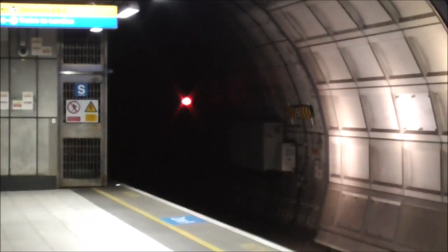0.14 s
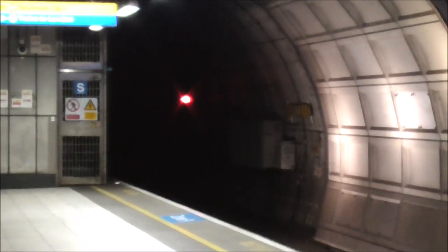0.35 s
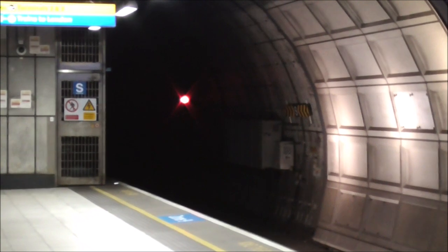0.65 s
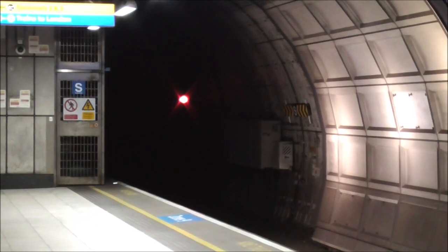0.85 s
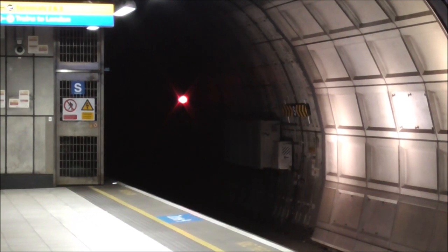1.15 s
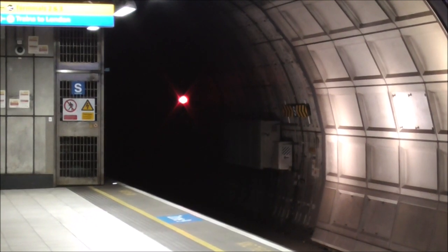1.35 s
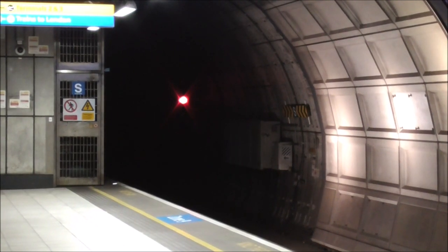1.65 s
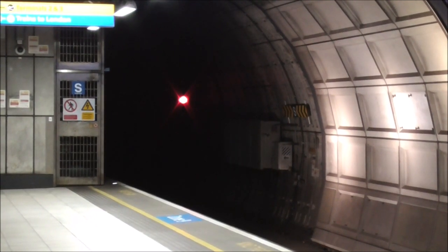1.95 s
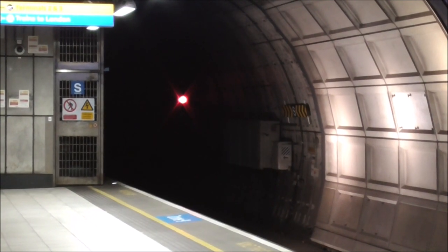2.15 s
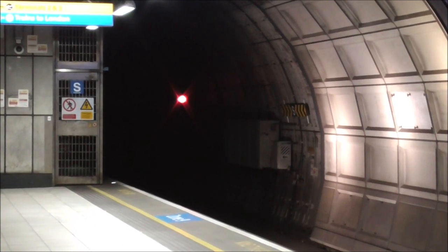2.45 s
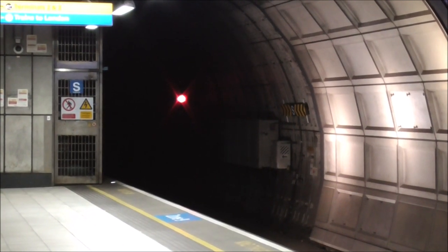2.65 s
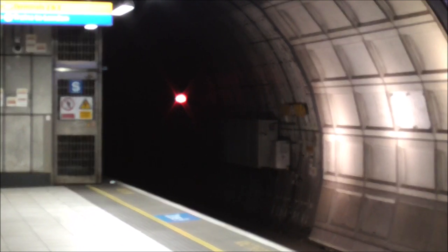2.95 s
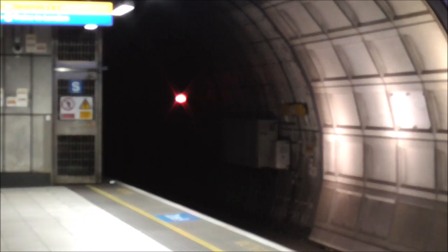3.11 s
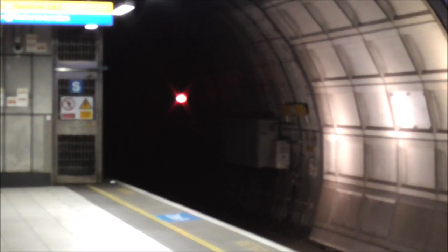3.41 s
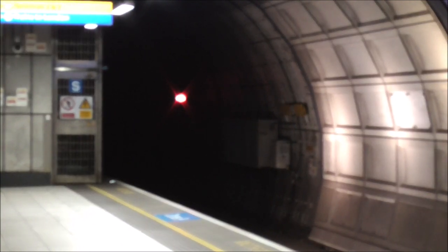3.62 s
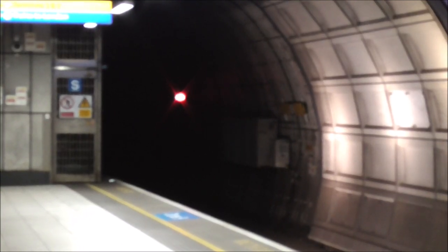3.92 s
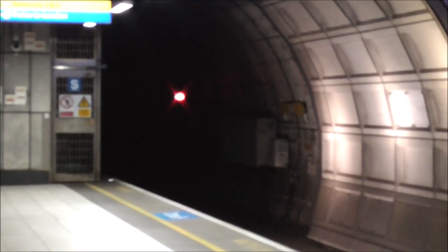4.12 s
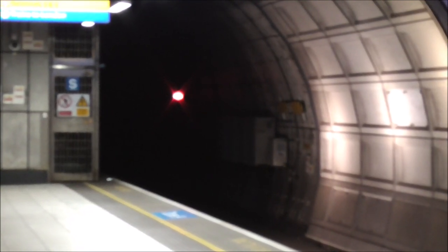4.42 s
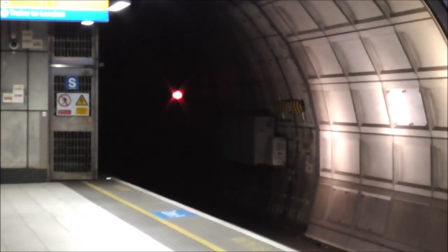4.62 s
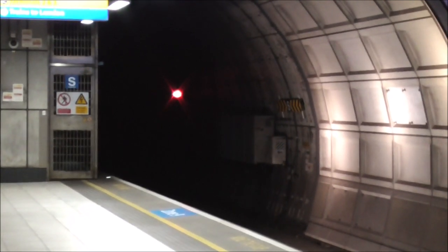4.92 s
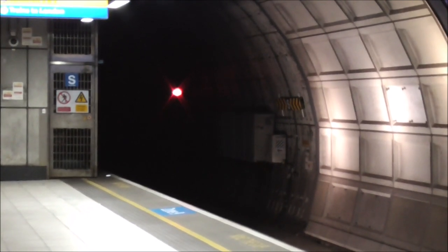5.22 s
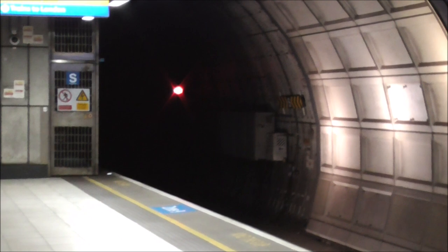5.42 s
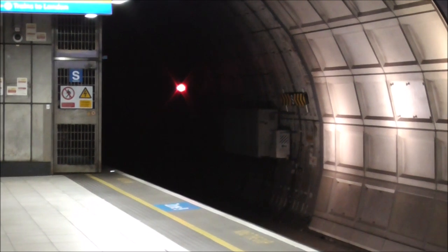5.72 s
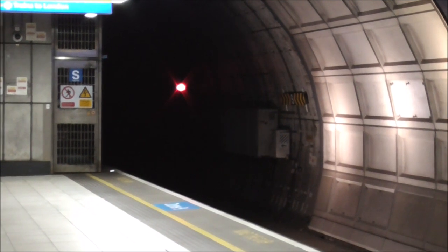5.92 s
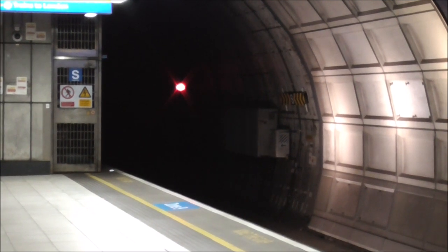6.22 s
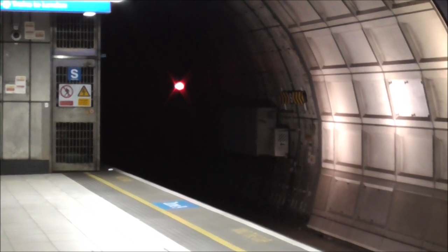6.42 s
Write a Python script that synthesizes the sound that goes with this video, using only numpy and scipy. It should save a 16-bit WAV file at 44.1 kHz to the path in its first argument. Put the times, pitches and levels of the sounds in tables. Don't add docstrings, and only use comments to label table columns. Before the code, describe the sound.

A deserted underground platform, heard by a small handheld camera with two close microphones. A low, hollow drone of tunnel air and fans holds almost level from start to finish, beneath thin bright hiss and a faint fifty-per-second buzz. From 0 to 0.55 s the lens motor hunts in dry, rattling bursts of tiny clicks with small metallic catches; isolated ticks follow until 0.7. Wind strikes the right microphone at 0.33, then both at about 0.6 in a crackling, overloaded slam with membrane rustle. More blunt thumps come at 1.05, 1.3-1.45 and 1.65-2.0, mostly right. From 2.1 the wind lulls, leaving drone and hiss. At 2.95 an even, very fast ticking purr starts, slightly right, continuing to the end at 6.5. Light bumps arrive at 3.4 and 4.35-4.6, a hard right slam at 5.0, another thump at 5.5, and softer buffets from 6.1 to 6.5.

```python
import sys
import numpy as np
from scipy import signal
from scipy.fft import rfft, irfft
from scipy.io import wavfile
from scipy.ndimage import uniform_filter1d

SR = 44100
rng = np.random.default_rng(int(sys.argv[2]) if len(sys.argv) > 2 else 0)


def file_out(sig):
    cols = np.atleast_2d(sig).T
    lim = np.clip(cols, -1, 1)
    pcm = np.round(lim * 32767).astype(np.int16)
    wavfile.write(sys.argv[1], SR, pcm)


def ratio_of_db(decibels):
    return 10 ** (np.asarray(decibels, float) / 20)


N = 289296
FIELD = SR // 50

# frequency in Hz, level in dB per Hz.
DRONE_COLOUR = [(40, -30), (90, -10), (170, -8), (300, -10), (600, -10), (930, -8), (1050, -24),
                (1250, -47), (1350, -44), (1400, -33), (1800, -38), (1900, -50), (2050, -45), (2600, -58)]
# time in seconds, level in dB.
DRONE_LEVEL = [(0, -35), (2.2, -35.5), (3.2, -34), (4.4, -35), (5.3, -34.5), (6.56, -34.5)]
# frequency in Hz, width in Hz, lift over the drone in dB.
TUNNEL_RESONANCES = [(207, 14, 10), (232, 24, 7), (255, 18, 9), (368, 18, 12), (485, 16, 3), (636, 20, 11),
                     (675, 18, 7), (711, 12, 4), (840, 14, 8), (895, 36, 4), (1110, 14, 4), (1410, 30, 6),
                     (1467, 24, 5), (1570, 34, 7), (1766, 16, 10), (2024, 14, 4)]
# frequency in Hz, likeness from 0 to 1.
PORT_LIKENESS = [(60, 0.59), (300, 1), (640, 0.85), (1400, 0.99), (2500, 1)]

# frequency in Hz, left level in dB per Hz, right level in dB per Hz.
HISS_COLOUR = [(1470, 19, 4), (2420, -11, -9.5), (3830, -2.5, -4), (5180, -7, -6), (5700, -12.5, -12),
               (7330, -6, -7), (8240, -5, -4.5), (10100, -3, -2.5), (12000, -4, -2), (13000, 1, -9.5),
               (14000, -2, -4), (14550, -3, -10), (16000, -15, -9)]

# burst start in seconds, burst end in seconds, case knock in dB.
FOCUS_HUNT = [
    (0.042, .11, -48.5),
    (.1423, .21, -50),
    (.2423, .51, -50.5),
    (.5422, .55, -51),
    (.6609, .67, -53),
    (0.702, .71, -52),
]
# time in seconds, level in dB.
GEAR_CATCHES = [
    (.0618, -52),
    (0.1023, -56),
    (0.161, -52),
    (.2014, -56),
    (0.3425, -49),
    (.4424, -52),
    (0.4816, -55),
]
# frequency in Hz, level in dB, 60 dB decay in seconds.
CASE_MODES = [(2372, 11, 0.0046), (2560, -1, 0.0073), (2846, -6, 0.0071), (3900, -5, 0.0085)]
# frequency in Hz, level in dB, 60 dB decay in seconds.
GEAR_MODES = [(3880, 0, .028), (4060, -5, .02)]
# frequency in Hz, level in dB, 60 dB decay in seconds.
SHELL_MODES = [(4590, -2.5, 0.015), (5010, 0, 0.012), (5400, -1, 0.012), (6420, -0.5, 0.0062),
               (7330, 0.5, 0.0064)]

# time in seconds, left level in dB, right level in dB.
DRAUGHT_LEVEL = [(0.0, -11.5, -16), (0.12, -75, -50.5), (0.36, -36, -30.5), (0.9, -52, -33),
                 (1.32, -22, -29), (1.8, -35.5, -25.5), (2.04, -39, -29), (2.16, -73, -53), (2.7, -56, -56),
                 (3.3, -54, -41), (3.5, -61, -32.5), (3.96, -47, -42), (4.32, -29, -26), (4.65, -35, -33.5),
                 (5.2, -54, -33.5), (5.5, -32, -25.5), (6.05, -37, -32), (6.56, -44, -31.5)]
# frequency in Hz, level in dB per Hz.
DRAUGHT_COLOUR = [(15, -24), (40, -5), (90, 0.5), (180, -0.5), (300, -2), (500, -26.5), (900, -21),
                  (1500, -42)]
# time in seconds, level in dB, length in milliseconds.
LEFT_BUFFETS = [(0.605, -7.5, 35), (0.699, -25.5, 42), (1.335, -14.5, 20), (1.437, -31, 24),
                (1.703, -20.5, 46), (1.84, -23.5, 38), (1.972, -28, 26), (3.431, -14.5, 6.7),
                (4.35, -19, 24), (4.507, -15, 24), (4.99, -28, 75), (6.084, -19.5, 12), (6.486, -12, 12),
                (6.543, -25, 34)]
# time in seconds, level in dB, length in milliseconds.
RIGHT_BUFFETS = [(0.331, -9.5, 11.5), (0.377, -14, 21), (0.618, 0, 19), (0.694, -12, 14), (1.048, -18, 8.7),
                 (1.273, -18, 35), (1.359, -13.5, 45), (1.399, -6, 14.3), (1.446, -13.5, 13),
                 (1.649, -17, 11), (1.673, -11.5, 20), (1.815, -22, 15), (1.965, -18.5, 31),
                 (4.331, -16.5, 40), (4.352, -15.5, 16), (4.509, -16.5, 20), (4.605, -17.5, 2.8),
                 (4.909, -11, 33), (4.964, -13, 7.1), (4.995, -2, 22.6), (5.028, -17.5, 16), (5.499, -9, 9),
                 (5.559, -20.5, 43), (5.743, -32, 15), (6.267, -28, 43), (6.354, -19, 14), (6.485, -16, 22),
                 (6.514, -23, 23)]
# time in seconds, level in dB, pitch in Hz, length in milliseconds.
RUSTLES = [(0.38, -35.5, 1110, 15), (.596, -21, 600, 19), (0.608, -33.5, 1200, 20), (0.623, -37, 1290, 11),
           (.632, -13.5, 563, 15), (.637, -50, 2180, 17), (.611, -55, 3600, 4.8), (.623, -54, 4200, 7.6),
           (1.357, -38, 1210, 14), (1.401, -39, 1090, 15), (1.674, -13.5, 442, 9.2),
           (1.691, -45, 1200, 7.9), (4.9987, -30.5, 1300, 5.4), (4.995, -23, 420, 14)]
# time in seconds, port (0 left, 1 right),
# peak as a share of full scale, width in milliseconds.
SLAMS = [
    (.3315, 1, .86, .75),
    (.599, 0, .75, .7),
    (.612, 1, .97, .5),
    (.6235, 1, -.72, .6),
    (1.3925, 1, .6, .75),
    (1.6685, 1, -.66, .55),
    (1.6768, 1, 1.05, .55),
    (4.9922, 1, .75, .9),
    (4.9987, 1, 1.06, .72),
]
LEAK = 0.17


def evened(x):
    return x / np.sqrt(np.mean(x ** 2) + 1e-20)


def read(points, hz, column=1):
    rows = np.transpose(points)
    return np.interp(np.log(hz + 1), np.log(rows[0] + 1), rows[column])


def curve(rows, column=1):
    rows = np.transpose(rows)
    return np.interp(np.arange(N) / SR, rows[0], rows[column])


def add(mix, s, sound):
    part = mix[round(s * SR):][:len(sound)]
    part += sound[:len(part)]


def colour(x, db_of_hz):
    hz = np.fft.rfftfreq(x.shape[-1], 1 / SR)
    return irfft(rfft(x) * ratio_of_db(db_of_hz(hz)), x.shape[-1])


def smoothed(x, size, axis=-1):
    return uniform_filter1d(uniform_filter1d(x, size=size, axis=axis), size=size, axis=axis)


def tunnel():
    frames, hz = N // 1024 + 5, np.fft.rfftfreq(4096, 1 / SR)
    a, b, c, d, patches = rng.standard_normal((frames, len(hz), 5)).T
    patches = evened(uniform_filter1d(uniform_filter1d(patches, size=6, axis=0), size=6, axis=1))
    lift_db = sum(db / (1 + (2 * (hz - f) / width) ** 2) for f, width, db in TUNNEL_RESONANCES)
    same = np.clip(read(PORT_LIKENESS, hz), -1, 1)[:, None]
    left = a + 1j * b
    right = same * left + np.sqrt(1 - same ** 2) * (c + 1j * d)
    shape_db = read(DRONE_COLOUR + [(9000, -100)], hz) + lift_db
    spectra = np.array([left, right]) * ratio_of_db(shape_db[:, None] + 1.21 * patches)
    drone = evened(signal.istft(spectra, nperseg=4096, noverlap=3072)[1][:, :N])
    balance_db = np.array([[.4], [-.4]])
    return drone * ratio_of_db(curve(DRONE_LEVEL) + 6.0 + balance_db)


def electronics():
    hiss_db, buzz_db = -59, [-65.5, -82]
    bright_hz, swell_depth = [13400, 10000], [.55, .3]
    phase = np.arange(N) % FIELD / FIELD
    out = np.zeros((2, N))
    for k in range(2):
        shade = lambda hz: read([(800, -53.5, -49), (1300, -8, -11)] + HISS_COLOUR, hz, column=k + 1)
        hiss = colour(rng.standard_normal(N), shade)
        bright = colour(hiss, lambda hz: -6 * ((hz - bright_hz[k]) / 1800.0) ** 2)
        swell = swell_depth[k] * np.sin(2 * np.pi * (phase - .03))
        burst = rng.standard_normal(FIELD) * (0.15 + np.exp(-np.arange(FIELD) / 34.0))
        buzz = np.resize(np.roll(colour(burst, shade), -20), N)
        out[k] = ratio_of_db(hiss_db) * (hiss + swell * bright) * 1.087 + ratio_of_db(buzz_db[k]) * evened(buzz)
    return out


def ring(blows, modes):
    scatter_db, scatter_t60_s = -2, 0.027
    t, at, out = np.arange(2000) / SR, np.flatnonzero(blows), np.zeros(N)
    chance_db = 1.5 * rng.standard_normal((len(at), len(modes)))
    fade = ratio_of_db(scatter_db - 23.5 - 60 * t[:600] / scatter_t60_s)
    shakes = rng.standard_normal((len(at), 600)) * fade
    for k, (hz, db, t60) in enumerate(modes):
        soft_start = 1 - np.exp(-(t / 0.00072) ** 2)
        tap = ratio_of_db(db - 60 * t / t60) * np.sin(2 * np.pi * hz * t) * soft_start
        uneven = blows.copy()
        uneven[at] *= ratio_of_db(chance_db[:, k])
        for s, shake in zip(at, shakes):
            add(uneven, (s + 40) / SR, blows[s] * shake)
        out += signal.oaconvolve(uneven, tap)[:N]
    return out


def lens():
    odd_step_db, odd_early_s, gear_db = -2.5, 0.00078, -66
    rattle_db, rattle_db_per_s = -50.5, -10.5
    steady_from_s, steady_db = 2.942, -51.5
    knocks, rings, rattles = np.zeros((3, N))
    for start, end, db in FOCUS_HUNT:
        at = np.arange(round(start * SR), round(end * SR), FIELD)
        odd = np.arange(len(at)) % 2
        at = at - odd * round(odd_early_s * SR)
        chance_db = 1.8 * rng.standard_normal((len(at), 3)).T
        knocks[at] = (1 - 2 * odd) * ratio_of_db(db + odd_step_db * odd + chance_db[0])
        rings[at] = ratio_of_db(gear_db + chance_db[1])
        rattles[at] = ratio_of_db(rattle_db + rattle_db_per_s * at / SR + chance_db[2])
    for s, db in GEAR_CATCHES:
        rings[round(s * SR)] += ratio_of_db(db)
    steps = np.arange(round(steady_from_s * SR), N - 9, FIELD)
    odd = np.arange(len(steps)) % 2
    at = steps + rng.integers(0, 6, len(steps))
    chance_db = .8 * rng.standard_normal((len(steps), 2)).T
    force_db = steady_db + 0.57 * odd + chance_db
    knocks[at] = (1 - 2 * odd) * ratio_of_db(force_db[0])
    rattles[at] = ratio_of_db(force_db[1] - 5.5)
    ticks = ring(knocks, CASE_MODES) + ring(rings, GEAR_MODES) + ring(rattles, SHELL_MODES)
    return np.array([np.roll(ticks, 1) * ratio_of_db(-3.5), ticks * ratio_of_db(1.5)])


def rustle(s, db, hz, length_ms):
    t = np.arange(-2, 2, 1000 / length_ms / SR)
    band = signal.butter(3, [hz * .55, hz * 1.25], "bandpass", fs=SR, output="sos")
    noise = signal.sosfilt(band, rng.standard_normal(4000))[-len(t):]
    return s - 2 * length_ms / 1000, ratio_of_db(db) * np.exp(-3 * t ** 2) * evened(noise)


def buffet(s, db, length_ms):
    t = np.arange(-1.2, 1.2, 1000 / length_ms / SR)
    hz = 217.7 + 1.4 * db
    wander = rng.standard_normal((2, 40))
    rate, size = (np.interp(t * length_ms, np.linspace(-80, 80, 40), w) for w in wander)
    turns = np.cumsum(hz * np.exp(0.306 * rate)) / SR
    turns = turns - turns[len(t) // 2]
    pushes = np.exp(1.3 * np.cos(2 * np.pi * turns)) * ratio_of_db(4.2 * size)
    shape = np.exp(-2.4 * t ** 2) * signal.windows.tukey(len(t), .3)
    return s - 1.2 * length_ms / 1000, ratio_of_db(db) * shape * evened(pushes - pushes.mean())


def draught_bed():
    lumpiness = evened(smoothed(rng.standard_normal(N), 700))
    lumps = rng.standard_normal(N) * ratio_of_db(4.9 * lumpiness)
    bed = evened(colour(lumps, lambda hz: read(DRAUGHT_COLOUR, hz)))
    return bed / np.sqrt(smoothed(bed ** 2, 5000) + 1e-9)


def draught():
    wake_db, wake_s = -24.5, 0.055
    ports = np.zeros((2, N))
    for k, buffets in enumerate([LEFT_BUFFETS, RIGHT_BUFFETS]):
        t = np.arange(0, N / SR, .005)
        wakes = sum(ratio_of_db(db + wake_db) * np.exp(-((t - s) / wake_s) ** 2) for s, db, _ in buffets)
        wakes = np.interp(np.arange(N) / SR, t, wakes)
        ports[k] = draught_bed() * (ratio_of_db(curve(DRAUGHT_LEVEL, column=k + 1)) + wakes)
        pushes = np.zeros(N)
        for row in buffets:
            add(pushes, *buffet(*row))
        band = signal.butter(3, [90, 700], "bandpass", fs=SR, output="sos")
        ports[k] += signal.sosfilt(band, pushes)
    ports = .7 * np.tanh(ports / .7)
    return signal.sosfilt(signal.butter(4, 1100, fs=SR, output="sos"), ports)


def slammed(mix):
    out = mix.copy()
    for s, port, peak, width_ms in SLAMS:
        u = (np.arange(N) / SR - s) * 1000 / width_ms
        push = 1.2 * np.exp(-u ** 2 / 2)
        push -= .5 * np.exp(-(u - 2.4) ** 2 / 5)
        push -= .26 * np.exp(-(u + 2.2) ** 2 / 5)
        swept_aside = out[port] * np.exp(-(u / 5.5) ** 4)
        change = peak * push / push.max() - swept_aside
        flanks = u ** 4 * np.exp(-u ** 2 / 9)
        change = change - flanks * change.sum() / flanks.sum()
        out[port] += change
        out[1 - port] -= LEAK * change
    return out


def scene():
    bass_leak, bass_leak_hz = 0.28, 90
    wind, fine = draught(), np.zeros(N)
    deep = colour(wind, lambda hz: -12 * (hz / bass_leak_hz) ** 2)
    for row in RUSTLES:
        add(fine if row[2] > 900 else wind[1], *rustle(*row))
    widened = wind - LEAK * wind[::-1] - bass_leak * deep[::-1]
    air = slammed(tunnel() + widened)
    return air + np.outer([-LEAK, 1], fine) + lens() + electronics()


def band_limit(x):
    return signal.sosfilt(signal.butter(12, 15610, fs=SR, output="sos"), x)


def record(dry):
    capped = np.clip(dry, -.985, .985)
    return band_limit(capped)


dry = scene()
out = record(dry)
file_out(out)
```